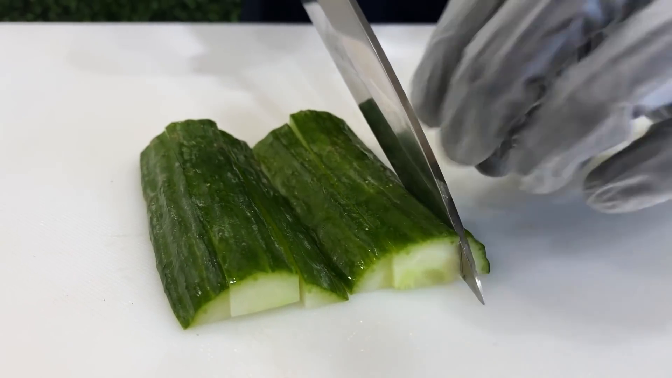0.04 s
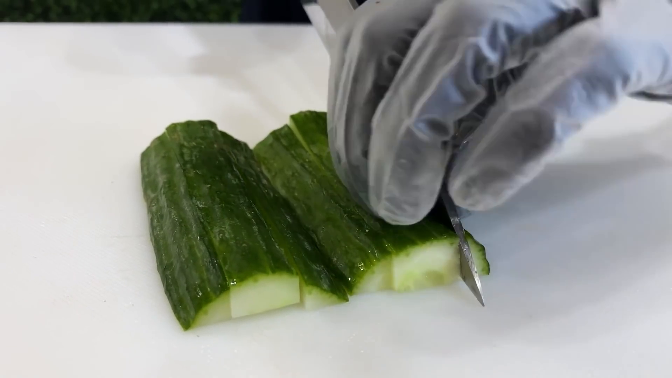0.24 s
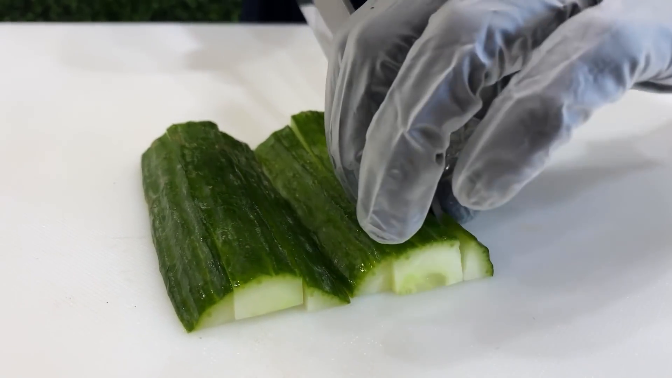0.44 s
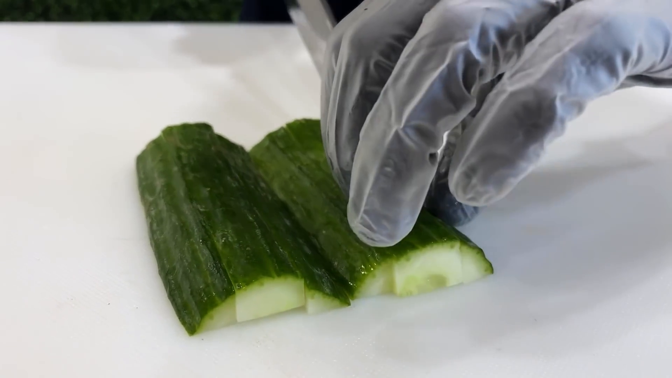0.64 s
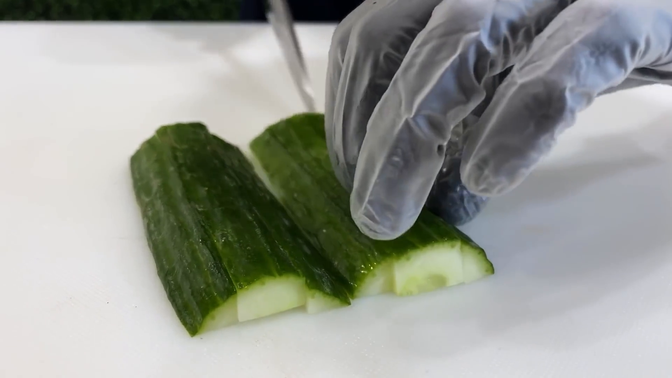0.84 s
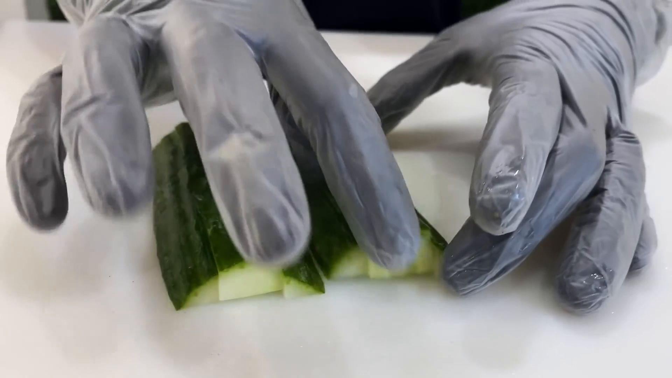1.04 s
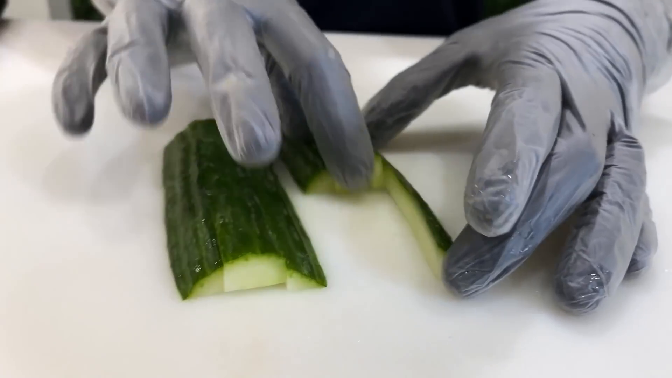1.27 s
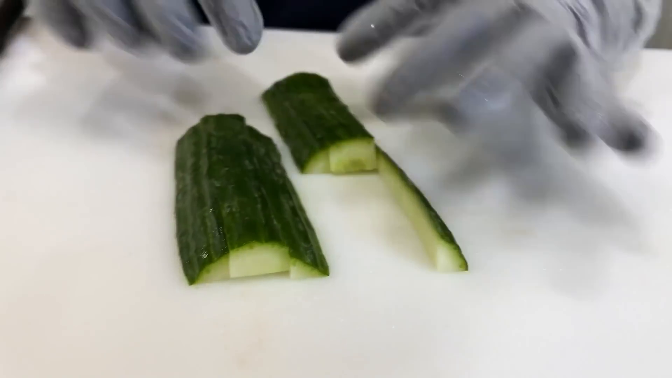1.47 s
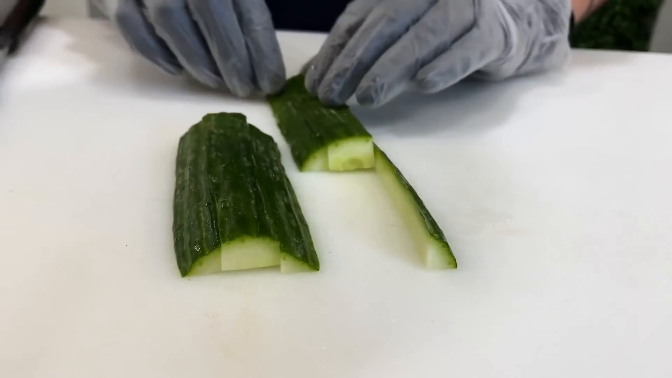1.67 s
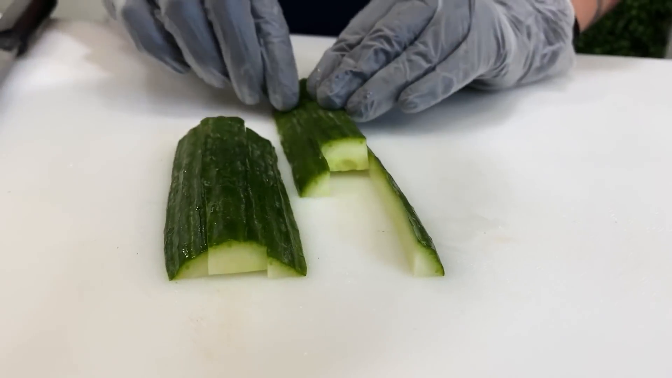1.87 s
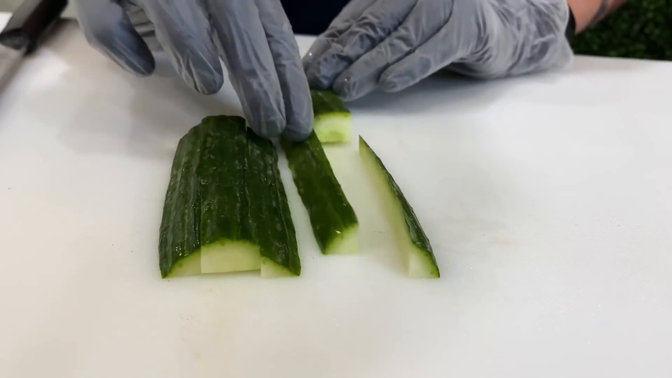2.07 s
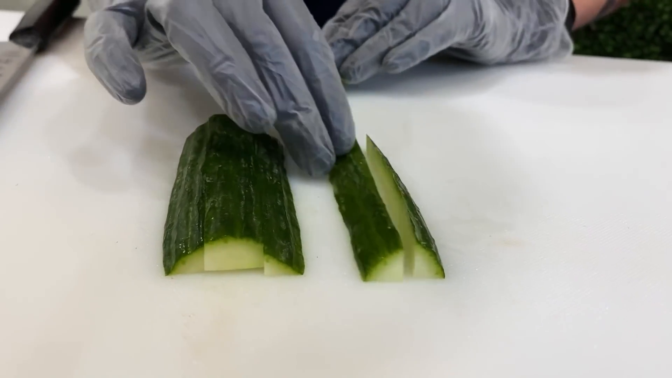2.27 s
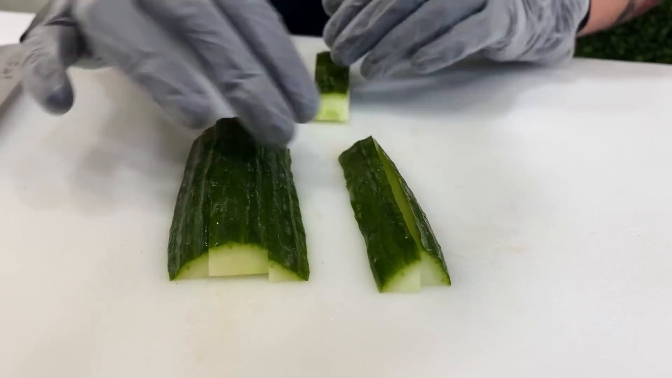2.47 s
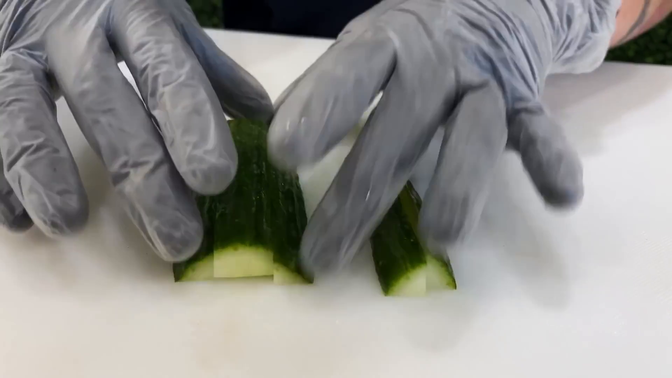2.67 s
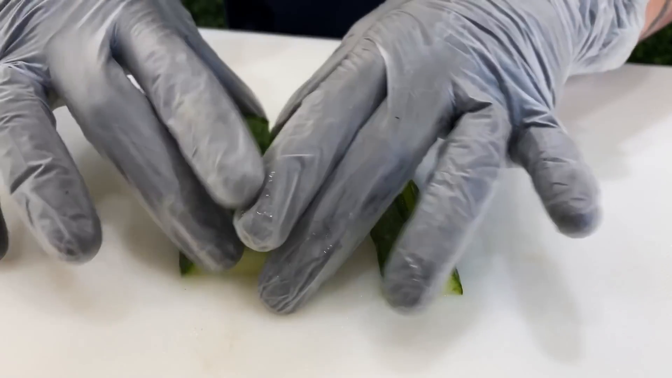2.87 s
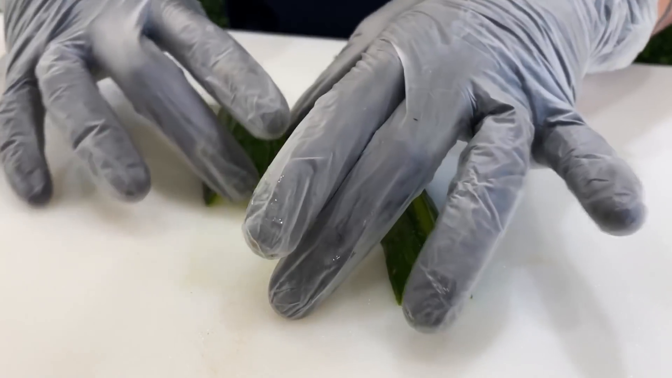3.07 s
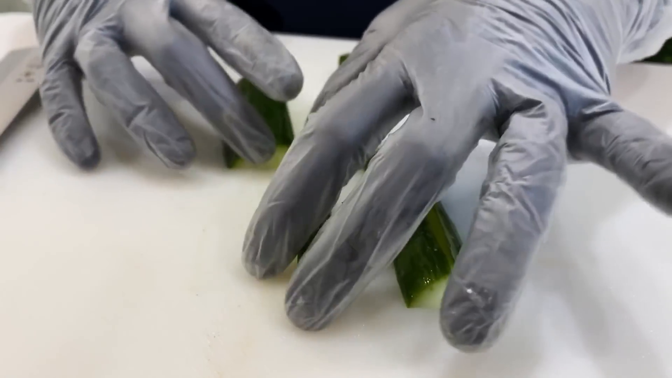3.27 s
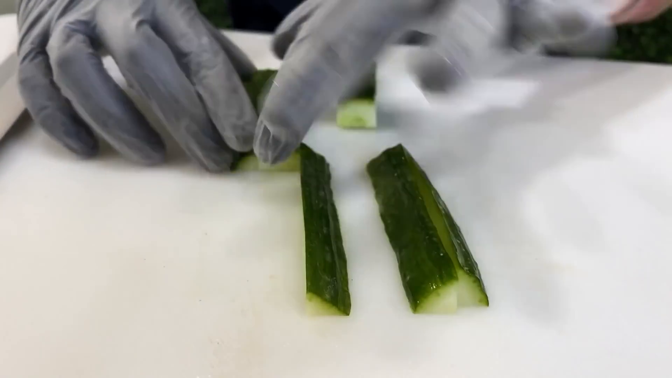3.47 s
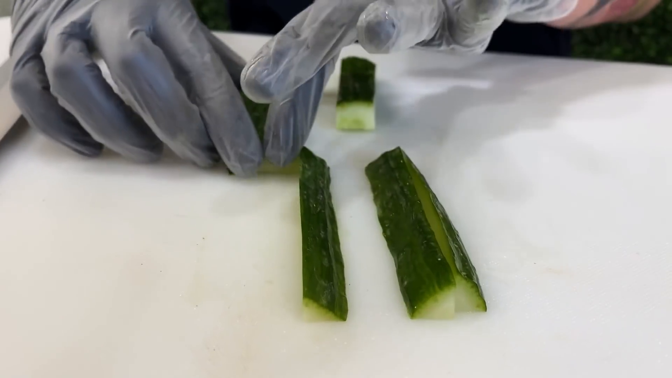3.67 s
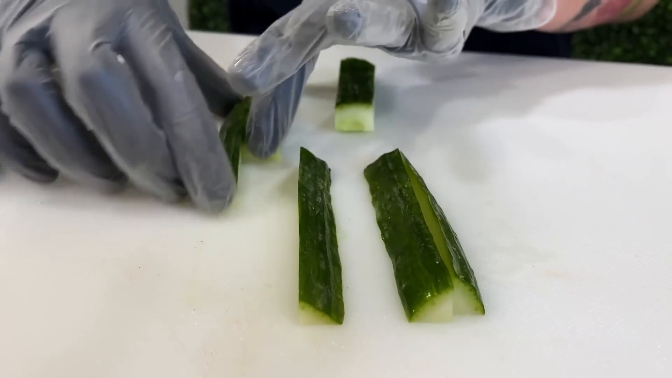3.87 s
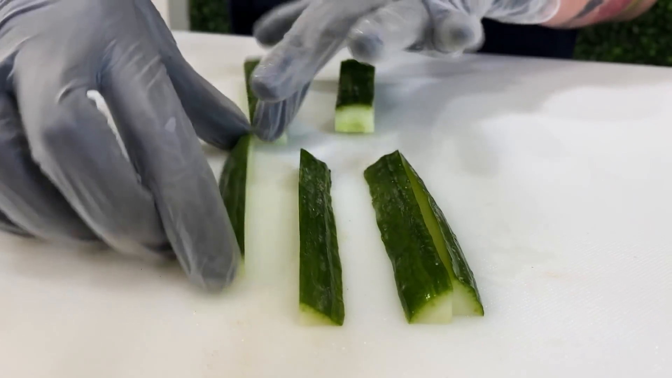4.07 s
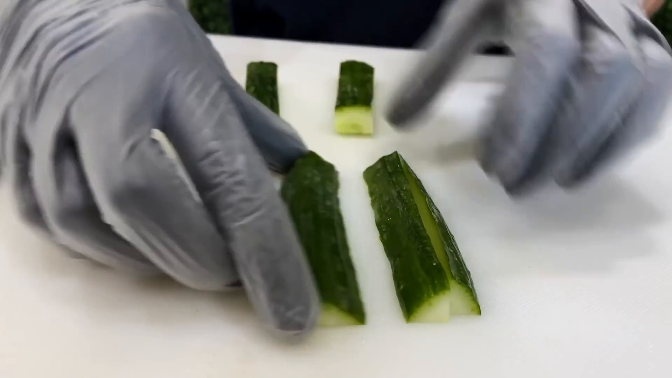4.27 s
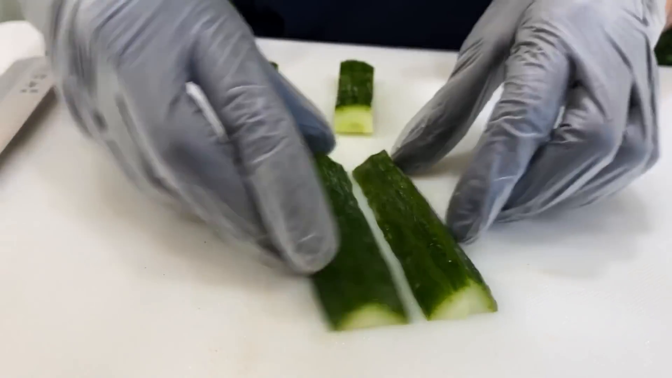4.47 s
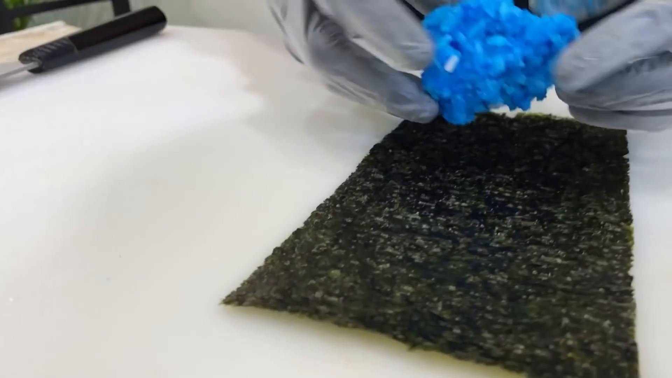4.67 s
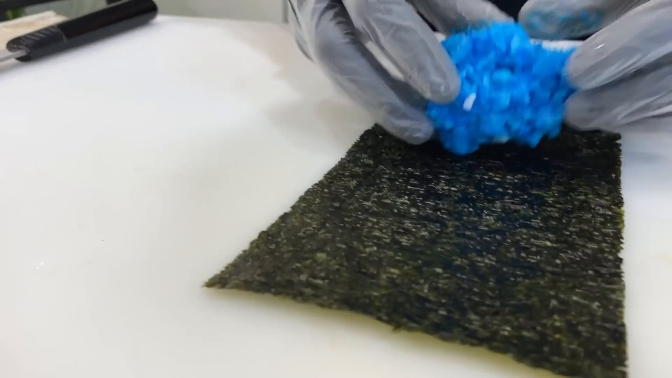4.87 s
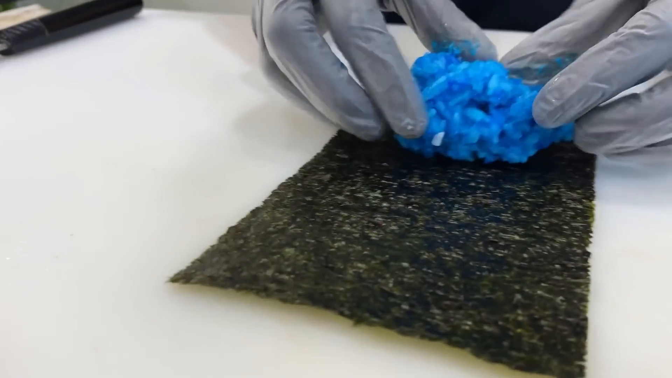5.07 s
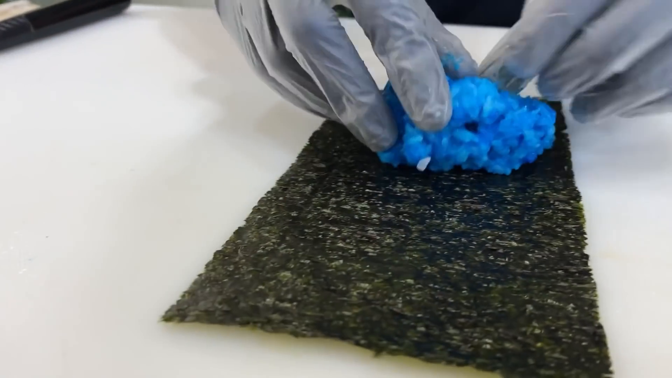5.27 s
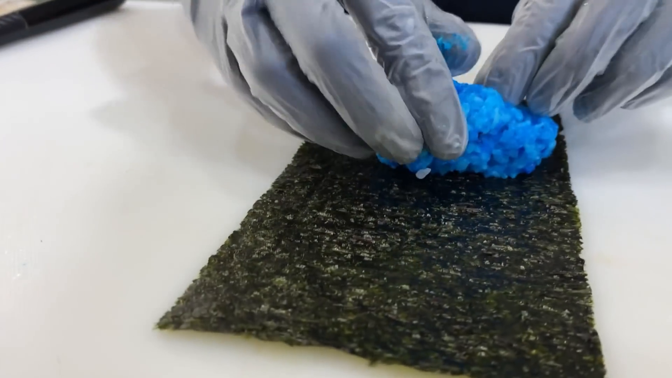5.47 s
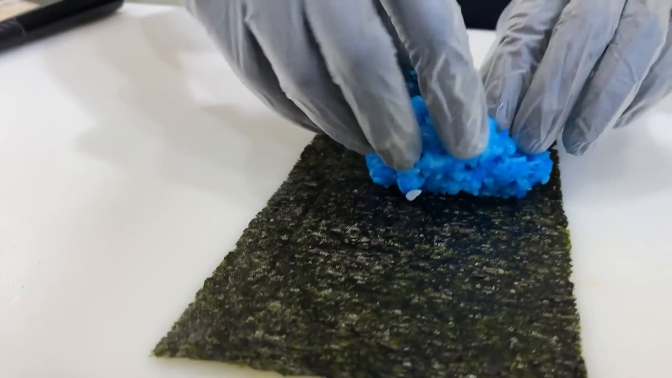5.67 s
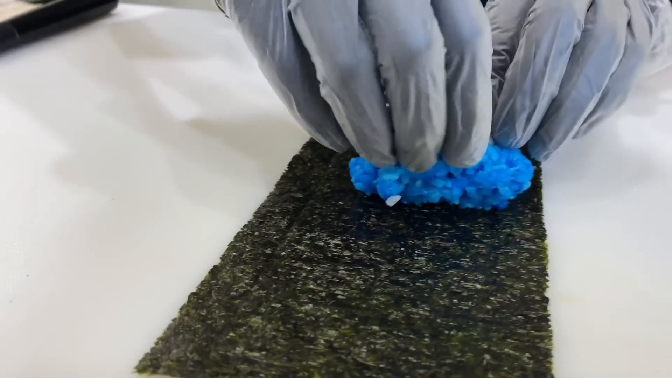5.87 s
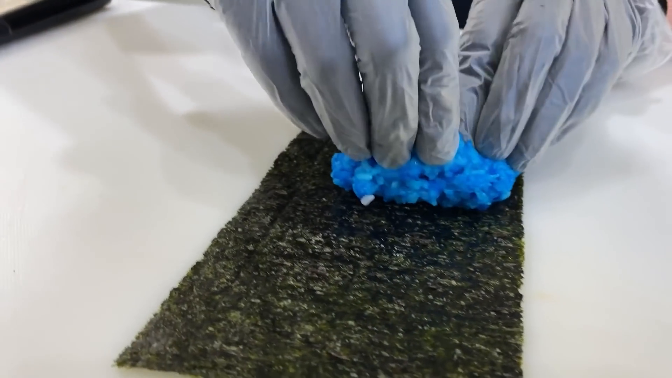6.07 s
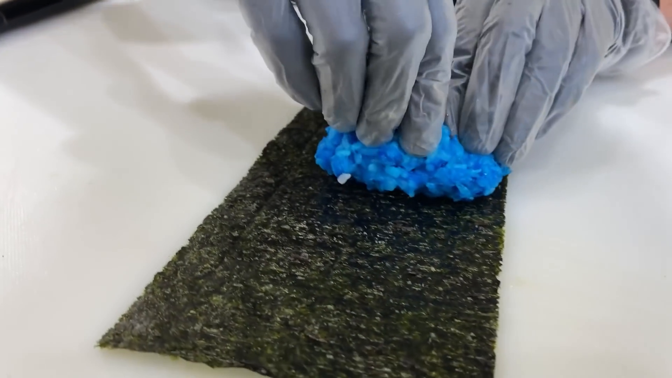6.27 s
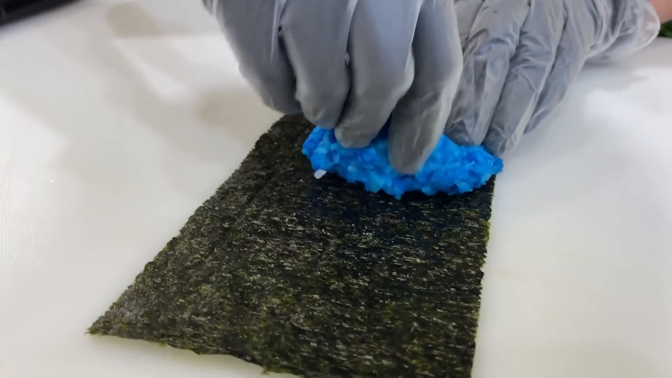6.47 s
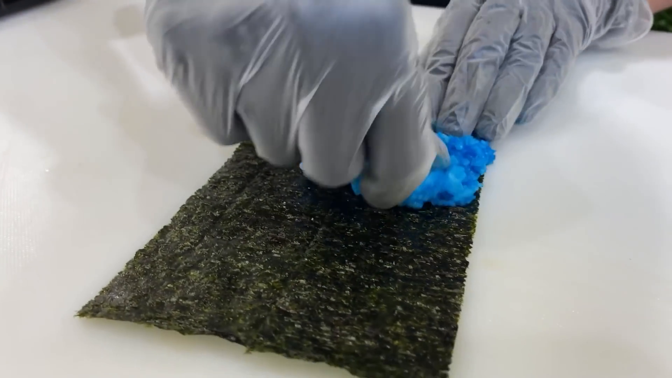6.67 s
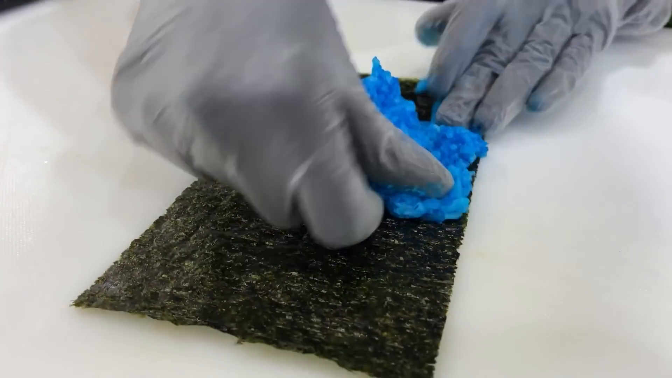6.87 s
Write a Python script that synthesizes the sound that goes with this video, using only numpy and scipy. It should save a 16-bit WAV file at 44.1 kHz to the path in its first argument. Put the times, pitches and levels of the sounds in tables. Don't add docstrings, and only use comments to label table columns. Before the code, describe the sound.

A brief, harsh creak dominates the first second: blade catching and slipping faster and faster, board groaning underneath, then an abrupt stop. Afterwards gloved hands softly rustle and shift cucumber sticks, with light knocks, slides and a tiny squeak. Later, dry bright snaps and sticky rustles come from rice handling. The microphone is close, the room small, and noise suppression makes the dull hum rise and fall.

```python
import sys
import numpy as np
from scipy import signal
from scipy.fft import rfft, irfft, next_fast_len
from scipy.io import wavfile
from scipy.ndimage import uniform_filter1d, map_coordinates

SR = 44100
rng = np.random.default_rng(int(sys.argv[2]) if len(sys.argv) > 2 else 0)


def log_audio(samples):
    frames = np.atleast_2d(samples).T
    limited = np.clip(frames, -1, 1)
    pcm = np.round(limited * 32767).astype(np.int16)
    wavfile.write(sys.argv[1], SR, pcm)


def boost(x):
    u = np.asarray(x, float) / 20
    return 10 ** u


N = 306054
CUT_S = .8987


def unit(x):
    return x / np.sqrt(np.mean(x ** 2) + 1e-20)


def along(points, hz):
    f, v = np.transpose(points)
    return np.interp(np.log(hz + 1), np.log(f + 1), v)


def curves(rows):
    s, *cols = np.transpose(rows)
    return [np.interp(np.arange(N) / SR, s, c) for c in cols]


def wobble(rate):
    knots = rng.standard_normal(int(N * rate / SR) + 4)
    return map_coordinates(knots, [np.arange(N) * rate / SR])


def louder(db, other_db):
    return 10 * np.log10(boost(2 * db) + boost(2 * other_db))


def moves(rows):
    slope_db = 15
    t = np.arange(0, N + 64, 32) / SR
    power = 1e-14
    for s, db, rise, fall in rows:
        away = np.maximum((s - t) / rise, (t - s) / fall)
        power = power + boost(2 * (db - slope_db * away))
    return np.interp(np.arange(N) / SR, t, 10 * np.log10(power))


def filtered(x, response):
    m = next_fast_len(x.shape[-1] + SR // 2)
    spectrum = rfft(x, m) * response(np.fft.rfftfreq(m, 1 / SR))
    return irfft(spectrum, m)[..., :x.shape[-1]]


def modes(table):
    def response(f):
        return sum((-1) ** k * boost(db) * 1j * f * w / (c * c - f * f + 1j * f * w)
                   for k, (c, w, db) in enumerate(table))
    return response


def soft(f, low_hz, top_hz):
    low = 1j * f / low_hz
    return (low / (1 + low)) ** 2 / (1 + 1j * f / top_hz) ** 2


def ledge(f, top_hz):
    return 1 / (1 - (f / top_hz) ** 2 + .8j * f / top_hz) ** 3


def climbing(x, response, rise, top):
    out = 0
    for k in range(3):
        share = np.clip(1 - np.abs(2 * rise - k), 0, 1)
        out = out + filtered(x * share, lambda f: response(f / top ** (k / 2)))
    return out


# frequency in Hz, likeness from 0 to 1.
ALIKE = [(60, 0.92), (130, 0.75), (290, 0.99), (640, 0.2), (1410, 0.081), (3100, 0.091), (6820, 0.78),
         (15000, 1)]


def rush(spectrum, patchy_db, speckle_db, grain_db):
    z = signal.stft(rng.standard_normal((2, N)), nperseg=512)[2]

    def field(wide, long):
        return unit(uniform_filter1d(uniform_filter1d(rng.standard_normal(z.shape[1:]), wide, 0), long, 1))

    def coloured(hz):
        turn = np.arccos(np.clip(along(ALIKE, hz), -1, .93)) / 2
        return boost(along(spectrum, hz)) * [np.cos(turn), np.sin(turn)]

    mottle_db = patchy_db * field(12, 12) + speckle_db * field(2, 4)
    pair = signal.istft(z * boost(mottle_db), nperseg=512)[1][:, :N]
    mid, side = filtered(pair * boost(grain_db), coloured)
    return unit(np.array([mid + side, mid - side]))


# frequency in Hz, time to fall 60 dB in seconds.
WALLS = [(100, 0.77), (1000, 0.5), (5000, 0.075)]


def room(x):
    hz, t, z = signal.stft(rng.standard_normal((2, SR // 3)), SR, nperseg=256)
    decay = boost(-60 * t / along(WALLS, hz)[:, None])
    tail = signal.istft(z * decay, SR, nperseg=256)[1]
    late = np.pad(x, (250, 0))[None]
    return signal.fftconvolve(late, tail / np.linalg.norm(tail[0]), axes=1)[:, :len(x)]


# peak in seconds, level in dB, rise in seconds, fall in seconds.
SHOVES = [(.006, -75, 0.011, 0.091), (.156, -70, 0.023, 0.056), (.33, -74, 0.053, 0.23),
          (.93, -71.5, 0.015, 0.23), (1.06, -63, 0.03, 0.19), (1.26, -66.5, 0.037, 0.14),
          (1.6, -72, 0.018, 0.16), (1.99, -61, 0.16, 0.33), (2.7, -76, 0.36, 0.065),
          (3.11, -64.5, 0.32, 0.31), (3.36, -57, 0.0067, 0.0091), (3.43, -65, .016, 0.034),
          (3.67, -74, 0.27, 0.023), (3.76, -62, 0.044, 0.79), (4.0, -70, 0.42, .3),
          (4.08, -56.5, 0.054, 0.074), (4.2, -69, 0.52, 0.92), (4.31, -54, 0.011, 0.018),
          (4.45, -57.5, 0.057, 0.049), (4.55, -61, 0.0023, 0.0048), (4.62, -68, 0.045, 0.11),
          (4.88, -84, 0.013, 0.099), (5.08, -55.5, 0.016, 0.024), (5.1, -77, .03, 0.1),
          (5.28, -67.5, 0.025, 0.2), (5.54, -60, 0.016, 0.026), (5.7, -82.5, 0.42, 0.8),
          (6.54, -78.5, 0.12, 0.42), (6.76, -75.5, 0.74, 0.31), (6.94, -63, 0.1, .1)]


def slide_level():
    return louder(moves(SHOVES), -93)


# frequency in Hz, strength in dB per Hz.
RUMBLE = [(11, -47), (18, -12.5), (48, 3), (63, 6.5), (85, -15), (105, 1), (140, -29.5), (230, -120)]
# frequency in Hz, strength in dB per Hz.
HUM = [(56, -43), (95, -18), (124, 1.5), (184, -6.5), (262, -5.5), (313, -11.5), (414, -7), (460, -12.5),
       (511, -11), (576, -20.5), (650, -25), (840, -26.5), (1430, -120)]
# time in seconds, opening in dB.
OPEN = [(0, 4), (.33, 3.5), (.93, 1.5), (1.45, 1), (1.55, -0.5), (1.95, 0), (2.5, 0), (2.63, 4), (3.28, -5),
        (3.41, 4.5), (4.34, 0.5), (4.88, 2), (5.05, 1), (5.95, 0.5), (6.45, -5), (6.55, -3), (6.94, 1.5)]
# peak in seconds, level in dB.
BUMPS = [(.16, -58), (2.63, -62), (3.47, -60), (3.87, -57), (4.09, -54.5), (4.34, -59.5), (4.5, -61),
         (4.84, -61), (6.599, -63)]
# peak in seconds, level in dB, rise and fall in seconds.
DRONES = [(.95, -60, 0.04, 0.18), (1.18, -59, 0.022, .05), (2.0, -59.5, .2, .3), (2.3, -62, .2, 0.1),
          (2.71, -57.5, 0.032, 0.075), (2.76, -64.5, 0.046, 0.14), (3.44, -61, 0.059, 0.11),
          (4.32, -53, .03, 0.25), (5.02, -71, 0.044, 0.19), (5.56, -69, 0.045, 0.066),
          (5.77, -67, 0.034, 0.039), (6.05, -61, 0.11, 0.17), (6.28, -70, 0.11, 0.084)]


def kitchen():
    open_db, = curves(OPEN)
    nudges_db = moves([(s, db, 0.1, 0.14) for s, db in BUMPS])
    rumble_db = louder(-67.5 + 0.86 * open_db, nudges_db)
    hum_db = -65.5 + open_db + 0.21 * (slide_level() + 72)
    hum_db = louder(hum_db - 1.0, moves(DRONES))
    mid, side = filtered(rng.standard_normal((2, N)), lambda hz: boost(along(RUMBLE, hz)))
    rumble = unit(mid + boost(-16.5) * side * [[1], [-1]])
    hum = rush(HUM, patchy_db=2.0, speckle_db=2.5, grain_db=0.72 * wobble(65))
    return (boost(rumble_db) * rumble + boost(hum_db) * hum) * boost([[.6], [-.6]])


# frequency in Hz, strength in dB per Hz.
RUSTLE = [(2820, -33.5), (4800, -3), (6520, -1.5), (7850, 0), (8230, -4), (8880, 0.5), (10200, -7),
          (13300, -17), (22000, -120)]
CRACKLE = [(6000, -25), (9800, 0.5), (11400, 0.5), (12600, 0.5), (14200, 0.9), (15700, -3.5)]
RUB = [(940, -11), (1600, -2.5), (1830, -5), (1980, 0.5), (2780, 0.5), (4310, -4.5), (5200, -12),
       (6760, -42.5), (11400, -120)]
SLIDE = [(320, -13), (550, -3.5), (846, -0.5), (1220, -4.5), (1520, -10.5), (1900, -13), (2470, -29.5),
         (4180, -120)]
# peak in seconds, level in dB, rise and fall in seconds, extra crackle in dB.
SORTING = [(0, -67.5, .1, 0.079, 6), (.18, -73, 0.057, 0.028, -7), (.376, -69, 0.034, 0.87, 7.5),
           (.522, -67.5, 0.28, 0.32, 7), (.852, -64, 0.44, 0.056, -3.5), (1.06, -58.5, 0.033, 0.061, -1.5),
           (1.2, -83, .3, 0.21, 10), (1.34, -62.5, 0.21, 0.055, -0.5), (1.96, -57.5, 0.11, 0.23, -1.5),
           (2.08, -73, .1, 0.16, 11.5), (2.31, -59, 0.019, 0.015, 1.5), (2.54, -65.5, 0.27, 0.48, 3),
           (2.72, -62, 0.038, 0.11, -11), (2.86, -62.5, 0.046, 0.16, -3), (3.249, -61.5, 0.048, 0.016, -6),
           (3.33, -65.5, 0.027, 0.024, 2), (3.439, -55.5, 0.037, 0.05, -7), (3.57, -61.5, 0.055, 0.19, 0),
           (3.761, -58, 0.031, 0.36, -1), (3.94, -62, 0.062, 1, 1), (4.12, -75.5, 1, 0.63, 2.5),
           (4.23, -53.5, 0.28, 0.23, -3.5), (4.46, -56, 0.033, 0.024, -7)]
# peak in seconds, level in dB, rise and fall in seconds, extra crackle in dB.
MOULDING = [(4.546, -61.5, 0.0046, 0.023, 2), (4.629, -60, 0.035, 0.016, 1), (4.9, -73, 0.022, 0.096, 9.5),
            (5.075, -51.5, 0.022, 0.02, 3), (5.1, -70, .03, 0.17, -1.5), (5.27, -64, 0.013, 0.18, 1),
            (5.503, -59.5, 0.024, 0.13, -2), (5.68, -64, 0.084, 0.071, 1.5), (5.82, -63, 0.086, 0.048, 5),
            (6.37, -87.5, 0.063, 0.96, 11.5), (6.639, -74.5, 1, .2, 3), (6.75, -56, 0.084, 0.051, 8),
            (6.82, -67, 0.13, .3, 4.5), (6.94, -54, 0.071, .1, 0.5)]
# start in seconds, idle rustle in dB, share of rub in dB,
# growth of the rub with the rustle (dB per dB).
SHOTS = [
    (0, -83.5, 1, 1.3),
    (CUT_S, -74.5, -0.68, 0.35),
    (3.5, -88, 0.5, 0.7946),
]
# middle in seconds, depth in dB, half length in seconds.
LULLS = [(0.11, 5.5, 0.04), (0.273, 10.5, 0.072), (0.93, 6.5, 0.054), (3.39, 10, 0.022), (3.69, 7, 0.041),
         (4.781, 9.5, 0.083), (5.22, 3, 0.04), (6.147, 8.5, 0.18)]


def hands():
    t = np.arange(N) / SR
    start, idle_db, share_db, grows = np.transpose(SHOTS)
    shot = np.searchsorted(start[1:], t)
    handling = SORTING + MOULDING
    rustle_db = louder(moves([row[:4] for row in handling]), idle_db[shot])
    crackle_db = louder(moves([(s, db + c, up, down) for s, db, up, down, c in handling]), idle_db[shot])
    even_db = -72
    rub_db = even_db + grows[shot] * (rustle_db - even_db) + share_db[shot]

    grain = wobble(400) + 0.65 * wobble(45)
    snaps = 6.5 * np.clip(wobble(900) - 1.6, 0, 2)
    rustle = boost(rustle_db) * rush(RUSTLE, patchy_db=1.77, speckle_db=1.5, grain_db=1.47 * grain + 0.27 * snaps)
    crackle = boost(crackle_db) * rush(CRACKLE, patchy_db=0.0, speckle_db=1.3, grain_db=2.4 * grain + snaps)
    rub = boost(rub_db) * rush(RUB, patchy_db=2.0, speckle_db=2.0, grain_db=1.35 * grain)
    rub = rub * boost([[1.2], [-1.2]])
    slide = boost(slide_level()) * rush(SLIDE, patchy_db=1.5, speckle_db=1.0, grain_db=1.4 * grain)

    shut_db = sum(db * np.exp(-((t - s) / half) ** 4) for s, db, half in LULLS)
    return boost(-shut_db) * rustle + boost(-1.6 * shut_db) * crackle + boost(-0.91 * shut_db) * rub + slide


# start in seconds,
# peak in dB, pitch in Hz, left over right in dB.
TICKS = [(2.298, -53, 8800, -1.5), (2.6385, -44, 6000, 3), (3.2405, -45.5, 7750, 5.5),
         (3.4171, -56, 7720, 6.5), (4.598, -49, 13800, -3), (4.6139, -38.5, 9500, -1),
         (5.049, -35, 13350, 10), (5.0687, -41, 11000, -3), (5.168, -41, 13600, 4), (5.256, -49, 9000, 2.5),
         (5.2971, -39.5, 5790, 6), (5.364, -42.5, 10400, 7), (5.5198, -43.5, 9200, 1.5),
         (5.5367, -36, 3250, 2), (5.6716, -38, 4600, 1), (5.9203, -52, 13000, -6),
         (6.5284, -42.5, 13200, 6), (6.5914, -47, 14400, 7.5), (6.6217, -45, 14000, 2),
         (6.6735, -36.5, 13600, -2), (6.6928, -31, 15100, 10), (6.715, -38.5, 11940, 2),
         (6.7326, -35, 14800, 1), (6.7484, -47, 14200, -5), (6.7629, -36, 8800, -0.5),
         (6.8459, -47, 13660, -7), (6.9227, -50, 3020, -2.5),
         (.0368, -46, 8200, -4), (.043, -58, 13500, 0), (.053, -55, 12000, 0), (.083, -50, 12000, 3),
         (.1555, -53, 3980, 8), (.172, -61, 9500, 1), (.19, -62, 7000, 3), (.2528, -58, 13900, -2),
         (1.0042, -51, 6440, 0), (1.2292, -55, 8740, -2.5), (1.6632, -46, 10400, 5.5),
         (2.5327, -46, 2820, 3), (2.6849, -45, 12300, 1.5), (2.7183, -50, 8930, 0.5),
         (2.843, -41.5, 10600, 2.5), (3.2262, -53, 10800, 1.5), (3.3209, -42, 9500, 3),
         (3.6327, -43, 4940, 4), (3.731, -57, 8810, 1), (4.5505, -45, 8600, 4), (4.875, -55, 9240, 4),
         (4.9453, -58, 7640, -12.5), (4.9814, -48, 2760, 6), (5.0304, -53, 8500, -7), (5.2, -56, 2500, 1),
         (5.222, -62, 3440, -4.5), (5.292, -48, 7000, 0), (5.414, -50, 8000, 0), (5.5035, -49, 8860, 5),
         (5.7, -43, 4300, 3), (5.713, -42, 9500, 1), (5.733, -48, 9000, 1), (6.041, -57.5, 10400, 3),
         (6.092, -62, 14000, -3)]


def creases():
    out, t = np.zeros((2, N + SR)), np.arange(SR // 20) / SR
    for s, db, hz, pan_db in TICKS:
        noise = signal.lfilter([1, -.5], [1], rng.standard_normal(len(t)))
        tone = np.sin(2 * np.pi * hz * t)
        crack = (.5 * noise + .5 * tone) * boost(-60 * t / .005)
        ears = boost(db - 1 + pan_db * np.array([[.5], [-.5]]))
        out[:, round(s * SR):][:, :len(t)] += ears * crack
    return out[:, :N]


# start in seconds, peak in dB, pitch in Hz, time to fall 60 dB in seconds.
TAPS = [(0.0774, -60, 2350, 0.0089), (.091, -63, 2700, 0.0065), (.135, -62, 2500, .006),
        (.16, -53, 297, .04), (.172, -56.5, 2550, 0.0098), (2.551, -52, 2880, 0.012),
        (2.684, -58, 840, 0.023), (3.356, -49, 920, 0.011), (4.21, -53, 980, 0.019),
        (4.306, -43.5, 870, 0.012), (1.054, -58.5, 1050, 0.052), (1.278, -56.5, 840, .03),
        (3.423, -56, 900, .01), (4.059, -55, 1250, 0.014), (5.058, -51, 2200, 0.0089),
        (5.279, -60, 1030, 0.011), (5.373, -55.5, 1240, 0.02), (5.518, -53, 1440, 0.011),
        (5.674, -56, 2300, 0.011), (6.657, -60, 1302, .01), (6.856, -59, 2170, .015),
        (4.551, -46.5, 810, 0.0067), (5.079, -37.5, 1028, 0.0031), (5.535, -59, 714, 0.012),
        (6.535, -58, 1460, 0.018), (6.897, -58, 2340, 0.015), (6.922, -45, 2870, 0.01)]
# start in seconds, pitch in Hz, level in dB, time to fall 60 dB in seconds.
THUD = (4.306, 255, -52, .09)


def taps():
    out, t = np.zeros(N + SR), np.arange(SR // 20) / SR
    for s, db, hz, t60 in TAPS:
        upper_hz = hz * rng.uniform(1.0, 1.94)
        pair = np.sin(2 * np.pi * hz * t) + 0.28 * np.sin(2 * np.pi * upper_hz * t)
        out[round(s * SR):][:len(t)] += boost(db - 60 * t / np.clip(t60, .004, .05)) * pair
    s, hz, db, t60 = THUD
    out[round(s * SR):][:len(t)] += boost(db - 60 * t / t60) * np.sin(2 * np.pi * hz * t)
    return out[:N] + boost(-13) * room(out[:N])


# start in seconds, length in seconds, first pitch in Hz, last pitch in Hz, level in dB.
SQUEAK = (4.436, .036, 1050, 1380, -58)


def squeak():
    s, length, from_hz, to_hz, db = SQUEAK
    u = np.clip((np.arange(N) / SR - s) / length, 0, 1)
    phase = 2 * np.pi * np.cumsum(from_hz + (to_hz - from_hz) * u) / SR
    return boost(db + 5.0 * wobble(350)) * np.sin(np.pi * u) ** .5 * np.sin(phase)


# pitch in Hz, level in dB, time to fall 60 dB in seconds.
LAID = (1025, -66, .9)


def laid_blade():
    hz, db, t60 = LAID
    t = np.arange(N) / SR - CUT_S
    level_db = db - 60 * np.abs(t) / t60 + 1.1 * wobble(52)
    return (t > 0) * boost(level_db) * np.sin(2 * np.pi * hz * t)


# time in seconds, cycles per second in Hz.
SPEED = [(.4, 39.6), (.528, 47.4), (.6, 65), (.665, 67), (.73, 75), (.78, 89), (.824, 102), (.85, 120),
         (.875, 126)]
# time in seconds, delay in cycles, gain in dB.
SECOND = [(.43, 0, -8), (.48, .02, 4), (.52, .17, -4), (.56, .06, 4), (.6, .24, 7), (.625, .2, 4),
          (.645, .03, 10), (.685, .04, 8), (.71, .16, -2)]


def slips(pattern, jitter, scatter_db, wander):
    cycle = np.cumsum(curves(SPEED)[0][:SR]) / SR
    cycle = cycle - cycle[round(.4261 * SR)]
    place, size_db = np.transpose(pattern)
    turns = np.arange(-4, 46)[:, None]
    delay, gain_db = (wander * np.interp(turns, cycle, c[:SR]) for c in curves(SECOND))
    chance = rng.standard_normal((2, 50, len(place)))
    when = turns + place + delay * [0, 1, .5] + jitter * chance[0]
    at = np.interp(when, cycle, np.arange(SR)).astype(int)
    size = boost(size_db + gain_db * [0, 1, 0] + scatter_db * chance[1])
    return np.bincount(at.ravel(), size.ravel(), SR)


def steady(x):
    power = uniform_filter1d(np.mean(np.atleast_2d(x) ** 2, 0), 2600)
    return x / np.sqrt(np.abs(power) + 1e-12)


# place in the cycle from 0 to 1, size in dB.
PUSHES = [
    (0, 4.5),
    (.385, -2),
    (.72, -12.5),
]
# pitch in Hz, width in Hz, level in dB.
BOARD = [(129.7, 29, -14), (165, 31, -16.5), (200, 30, -30), (260, 21.2, 0.5), (380, 53, -14),
         (432, 22, -8.5), (492, 24, -10), (558, 24, -18.5)]
# pitch in Hz, width in Hz, level in dB.
DEEP = [(394, 26, 0.5), (652, 45, -15.5), (716, 39, -13.5), (819, 80, -14)]
# pitch in Hz, width in Hz, level in dB.
LOOSE = [(95, 34, -12)]
# pitch in Hz, width in Hz, level in dB.
COUNTER = [(140, 130, -19.5), (250, 50, -31), (421, 55, -12), (493, 10, -34.5), (630, 65, -16.5)]
# time in seconds, level in dB.
GROAN = [(.34, -62), (.385, -40.5), (.52, -35), (.563, -30), (.597, -34), (.651, -27.5), (.76, -32.5),
         (.812, -33), (.89, -23)]
# peak in seconds, level in dB, rise in seconds, fall in seconds.
SURGES = [
    (.742, -25, .03, .02),
    (.779, -25, 0.015, .04),
    (.826, -33, 0.014, .02),
]


def board_groan(friction, rise):
    even = slips(PUSHES, jitter=.007, scatter_db=1.5, wander=.3)
    push = filtered(even + .01 * friction, lambda f: soft(f, low_hz=85, top_hz=720))
    board = filtered(push, modes(BOARD))
    board = board + filtered(push * rise ** 3, modes(DEEP)) + filtered(push * (1 - rise), modes(LOOSE))
    groan = board * boost([[.5], [-.5]]) + filtered(push, modes(COUNTER)) * [[1], [-1]] + boost(-12) * room(board)
    level_db = louder(curves(GROAN)[0], moves(SURGES))[:SR]
    level_db = uniform_filter1d(level_db, size=400)
    return boost(level_db) * steady(groan)


# pitch in Hz, width in Hz, level in dB.
BLADE = [(836, 83, 9.5), (900, 62, 10), (1126, 290, 0), (1360, 250, -5.5), (1740, 94, -20.5)]


def steel(f):
    return modes(BLADE)(f) * soft(f, low_hz=656, top_hz=4000) * ledge(f, top_hz=1510)


# pitch in Hz, width in Hz, level in dB.
CLACK = [(1200, 800, 0)]


def blade_rasp(train, friction, rise):
    def clack(f):
        return modes(CLACK)(f) ** 2 * ledge(f, top_hz=1550)

    blade = climbing(train + 0.0092 * friction, steel, rise, top=1.24)
    blade = blade + boost(-8) * climbing(train, clack, rise, top=1.15)
    return steady(blade + boost(-12) * room(blade))


# pitch in Hz, width in Hz, level in dB.
EDGE = [(2130, 520, 0), (2700, 340, -8.5), (3750, 900, -3)]


def edge_scrape(train, friction, rise):
    def thin_edge(f):
        return modes(EDGE)(f) ** 2 * soft(f, low_hz=1900, top_hz=4500)

    edge = climbing(train + 0.15 * friction, thin_edge, rise, top=1.09)
    return steady(edge * boost([[2], [-2]]) + boost(2) * room(edge))


# time in seconds, peak in dB.
SNAGS = [(0.351, -49), (0.373, -41), (.385, -50), (0.412, -38), (0.428, -27.5), (.45, -39.5), (.518, -37),
         (0.557, -32.5), (0.629, -33)]


def snag_jerks():
    jerks = np.zeros(SR)
    for s, db in SNAGS:
        jerks[round(s * SR)] = boost(db + 29)
    jerks = filtered(jerks, steel)
    return jerks + boost(-6) * room(jerks)


# time in seconds, rasp in dB, scrape in dB.
STROKE = [(.345, -68, -90), (.4, -72, -79), (.435, -53, -69), (.62, -44, -59.5), (.89, -51, -52)]
# place from 0 to 1, size in dB.
CATCHES = [
    (0, 0.5),
    (0.379, -3),
    (.7, -7.5),
]
# time in seconds, progress from 0 to 1.
RISE = [(.35, 0), (.6, 0.52), (.9, 1)]


def knife():
    t = np.arange(SR) / SR
    rise = curves(RISE)[0][:SR]
    train = slips(CATCHES, jitter=0.011, scatter_db=1.5, wander=1)
    friction = rng.standard_normal(SR) * signal.lfilter([1], [1, -.985], train)
    rasp_db, scrape_db = (c[:SR] for c in curves(STROKE))
    swells = [(s, db - 28.5, 0.015, 0.0057) for s, db in SNAGS]
    rasp_db = louder(rasp_db, moves(swells)[:SR])
    out = board_groan(friction, rise) + snag_jerks()
    out = out + boost(rasp_db + 1) * blade_rasp(train, friction, rise)
    out = out + boost(scrape_db) * edge_scrape(train, friction, rise)
    out = out * np.clip((t - .325) / 0.039, 0, 1) * (t < CUT_S)
    return np.pad(out, ((0, 0), (0, N - SR)))


def scene():
    return kitchen() + hands() + creases() + taps() + squeak() + laid_blade() + knife()


def low_pass(x):
    return signal.sosfilt(signal.butter(12, 16510, fs=SR, output="sos"), x)


# start in seconds, end in seconds.
GAP = (4.533, 4.544)


def record(dry):
    t = np.arange(N) / SR
    x = dry * np.clip(np.maximum((GAP[0] - t) / .006, (t - GAP[1]) / .002), .13, 1)
    band = filtered(x, lambda hz: np.exp(-((hz - 12050) / 200) ** 4))
    x = x - band * np.clip(2 + 4 * wobble(9), 0, .97)
    x = filtered(x, lambda hz: np.where(hz < 15750, 1, boost(-30)))
    return low_pass(x)


dry = scene()
out = record(dry)
log_audio(out)
```